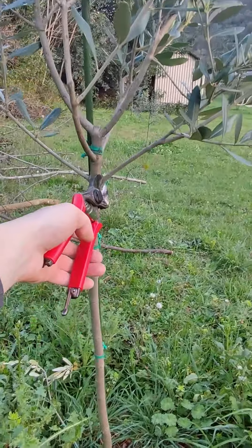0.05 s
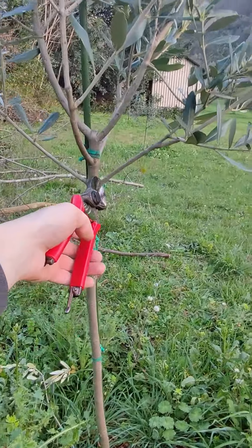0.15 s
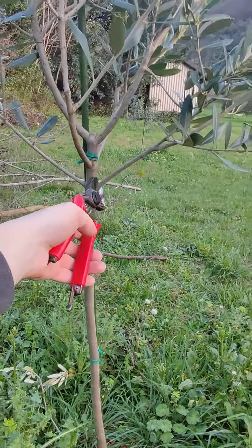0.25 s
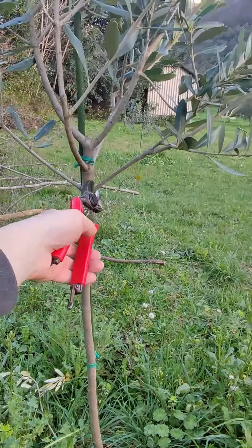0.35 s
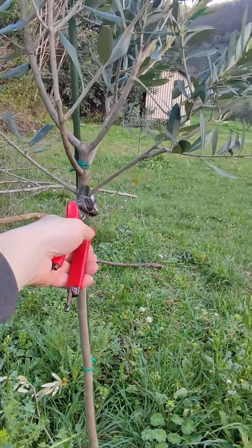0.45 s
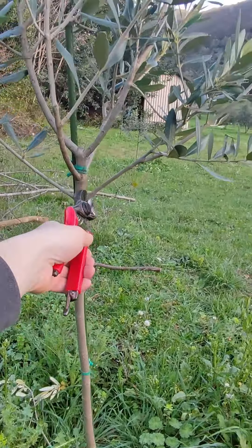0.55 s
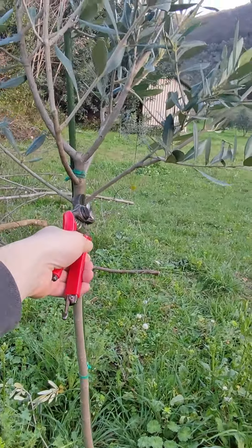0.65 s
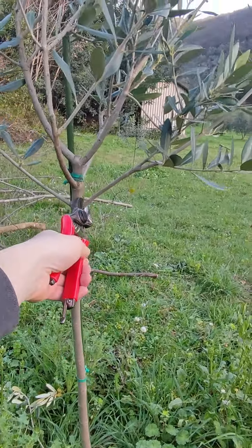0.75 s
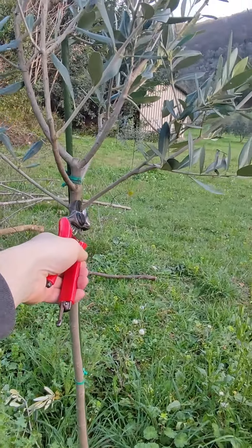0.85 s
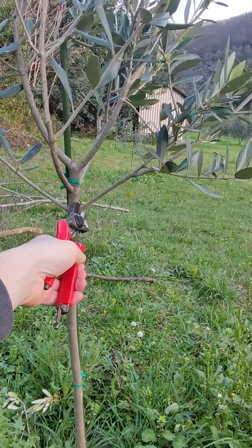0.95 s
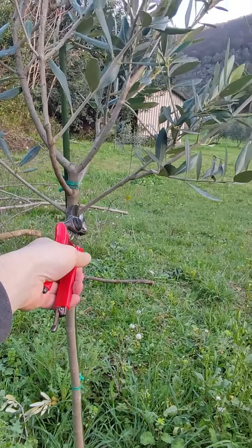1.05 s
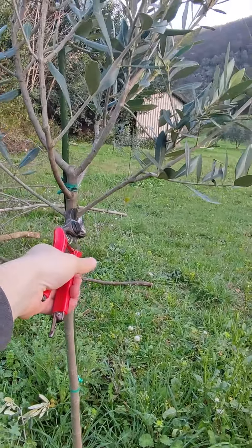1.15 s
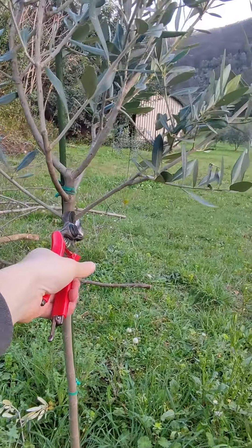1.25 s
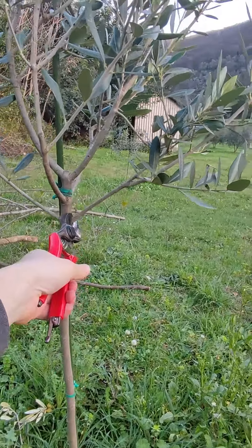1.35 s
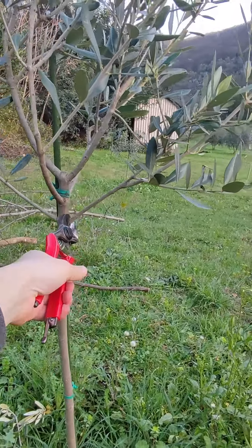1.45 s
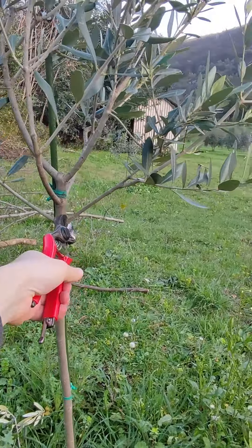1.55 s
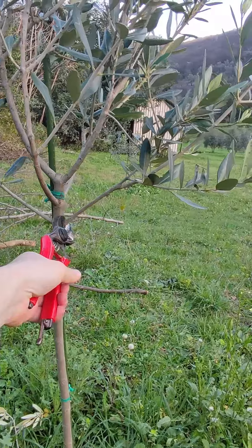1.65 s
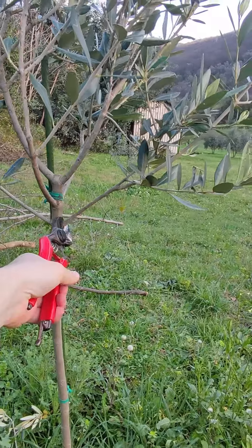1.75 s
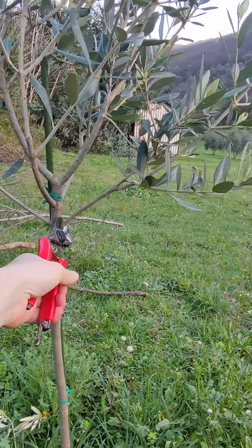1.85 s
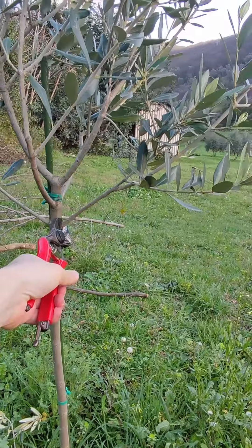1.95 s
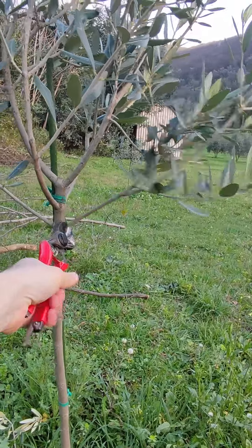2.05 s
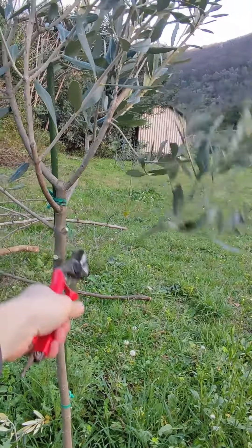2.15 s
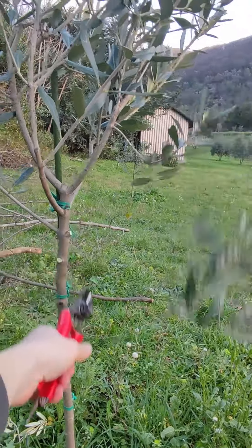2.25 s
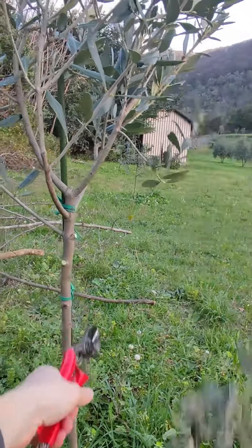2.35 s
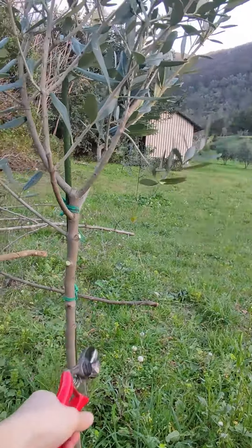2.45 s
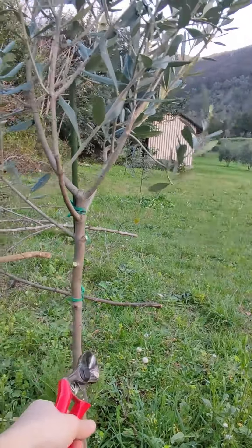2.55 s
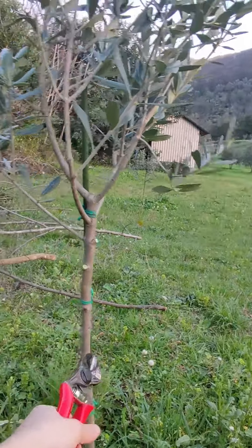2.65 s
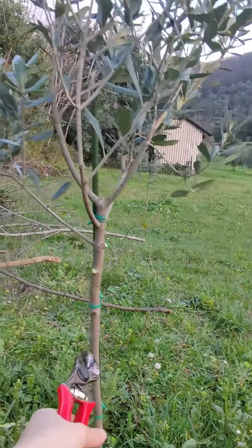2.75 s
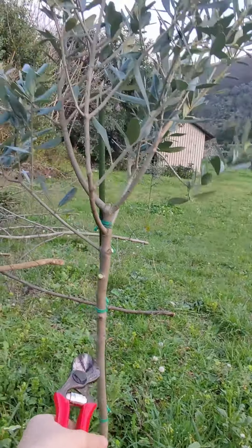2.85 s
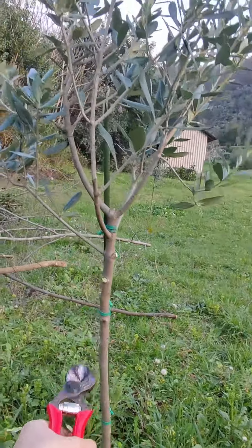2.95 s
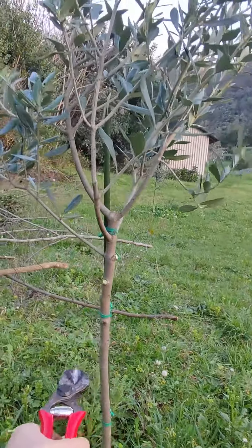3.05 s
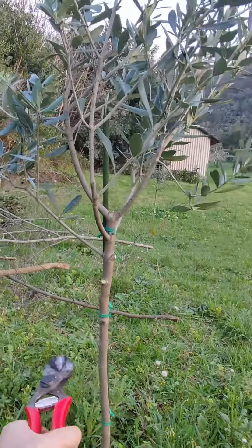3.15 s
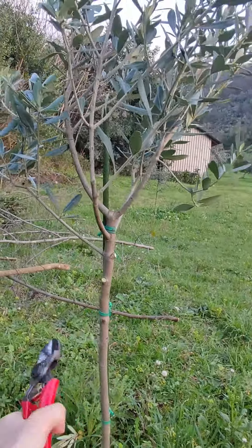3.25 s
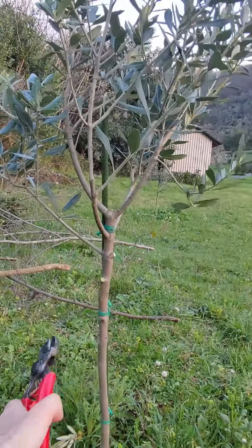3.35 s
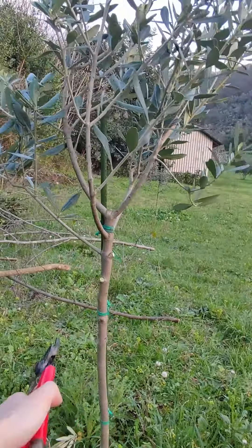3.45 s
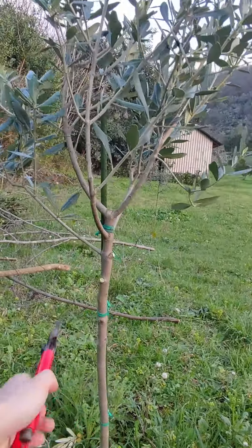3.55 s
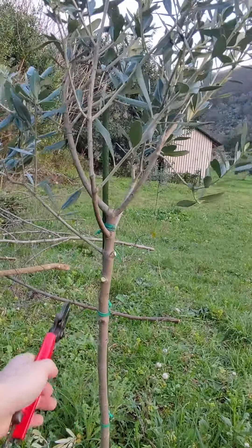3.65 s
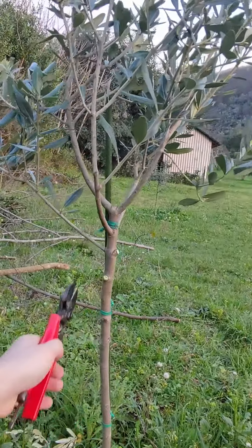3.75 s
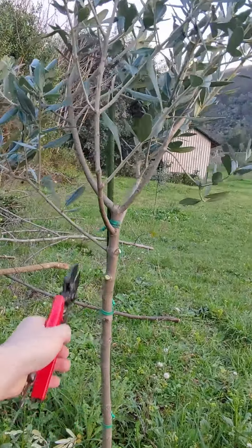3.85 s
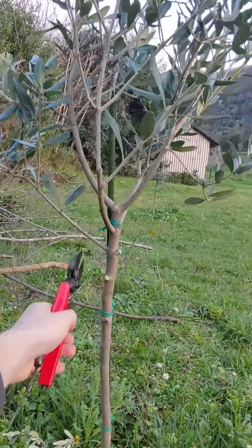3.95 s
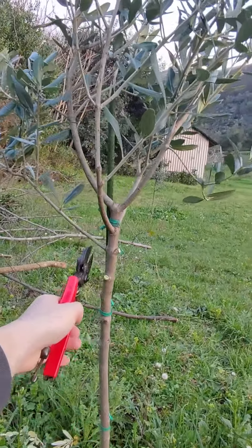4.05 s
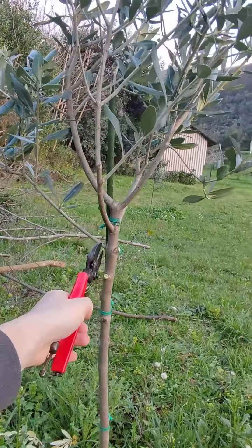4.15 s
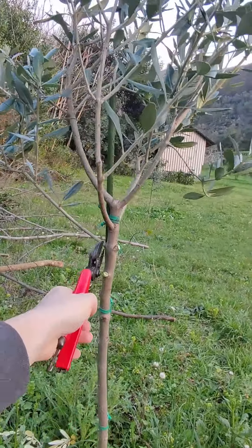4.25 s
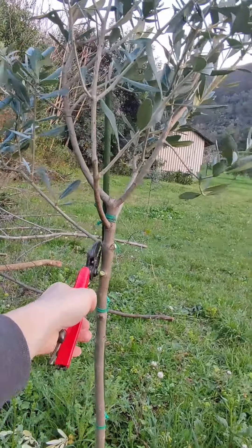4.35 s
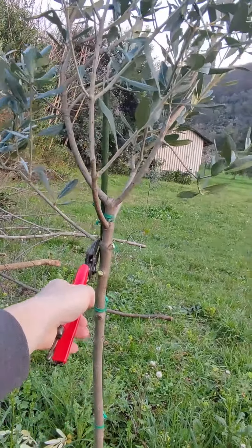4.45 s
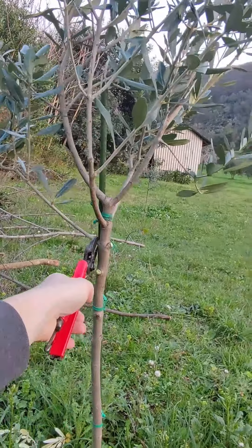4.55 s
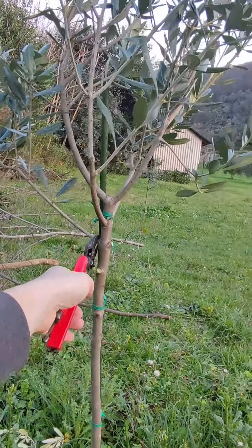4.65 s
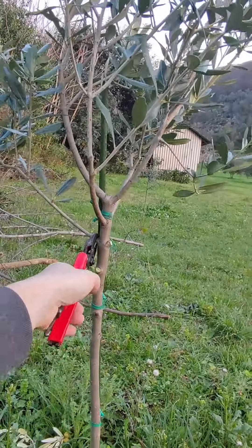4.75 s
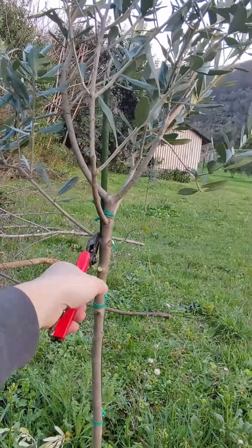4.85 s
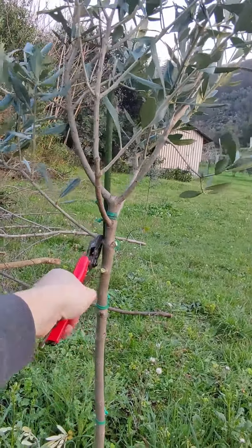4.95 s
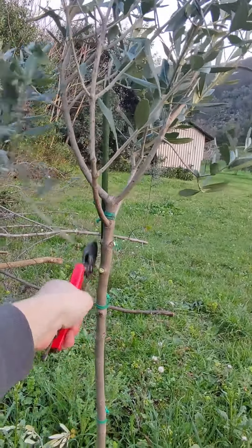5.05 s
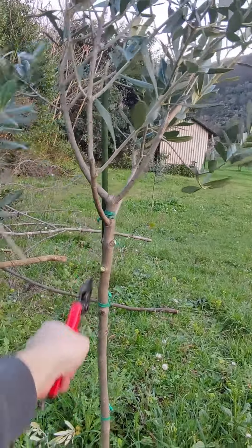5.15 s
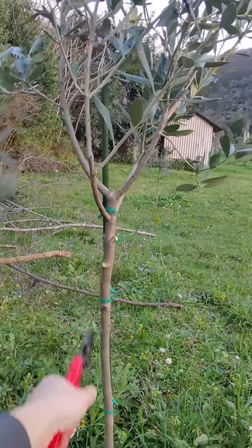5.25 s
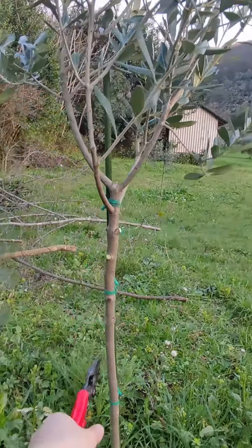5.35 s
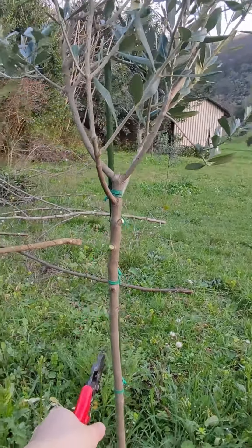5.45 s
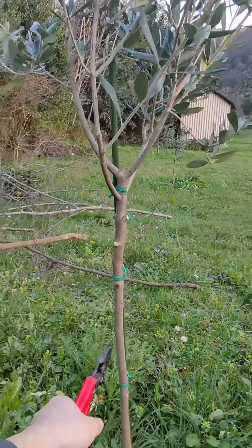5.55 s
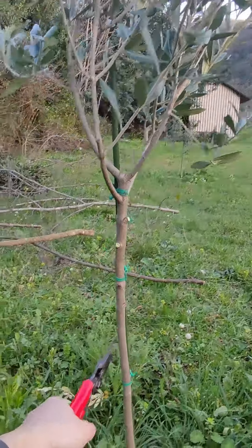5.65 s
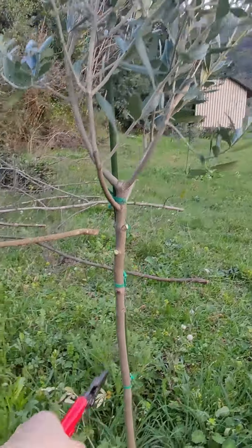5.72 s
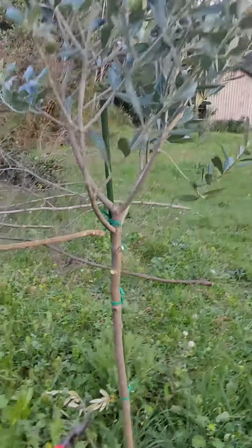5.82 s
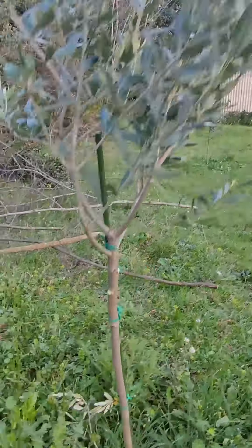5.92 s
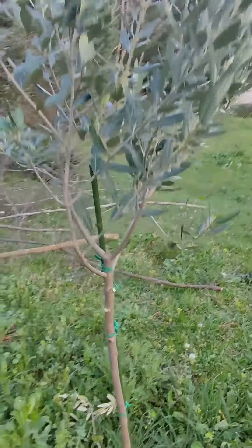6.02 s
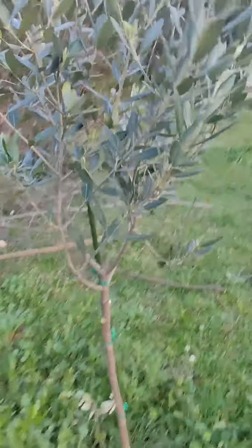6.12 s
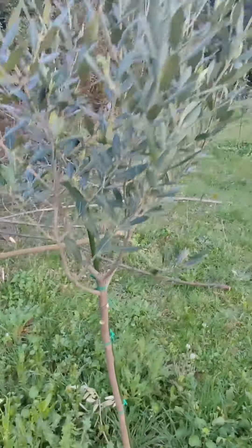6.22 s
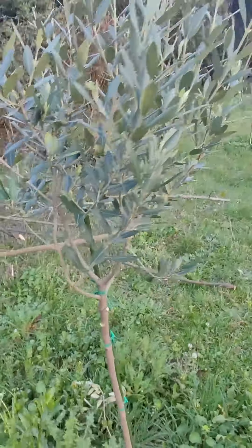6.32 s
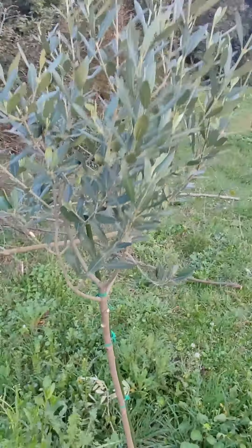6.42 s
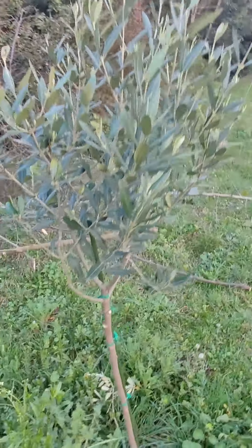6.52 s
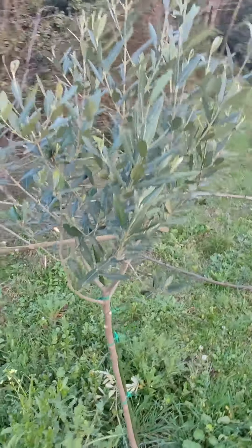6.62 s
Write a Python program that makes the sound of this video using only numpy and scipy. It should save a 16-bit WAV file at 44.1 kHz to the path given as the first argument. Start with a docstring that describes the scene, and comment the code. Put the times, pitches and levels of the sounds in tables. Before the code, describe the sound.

Soft valley air and low, uneven handling rumble lie under tiny far-off bird calls. A bright, woody snip breaks the calm, followed by a brief leafy brush. Birds and faint finger rubs continue until another crisp snip, slightly brighter. The shoot swishes down with dry ticks, and the take ends in muffled thumps from fingers on the device, leaning right.

```python
"""Pruning a young tree

Hand shears snip two shoots off a young tree in a quiet orchard, close to a hand-held camera.
Each cut excites ringing tones, scattered echoes and a crackle of noise; grains of noise make the leaves.
The leafy shoots slide down into the grass. Small birds, built from gliding tones, call far off.
Fingers rub (uneven noise) and knock (short pulses) on the camera beside its right microphone,
the tool ticks once, and low rumble and a soft wash of air lie underneath."""
import sys
import numpy as np
from scipy import signal
from scipy.fft import rfft, irfft
from scipy.io import wavfile

SR = 44100
rng = np.random.default_rng(int(sys.argv[2]) if len(sys.argv) > 2 else 0)


def to_wav(sig):
    """Store sig (one row per channel, or 1-D mono) as 16-bit WAV at the path in sys.argv[1].

    Samples outside -1..1 are clipped; the rate is SR.
    """
    pcm = np.clip(np.atleast_2d(sig), -1, 1) * 32767
    pcm = np.round(pcm).astype(np.int16)
    wavfile.write(sys.argv[1], SR, pcm.T)  # frames by channels


N = 294588
T = np.arange(N) / SR  # time of every sample [s]
HZ = np.fft.rfftfreq(N, 1 / SR)  # frequency of every spectrum bin

# wood giving way under the blade: (time [s], strength [dB], which cut [0 or 1])
FRACTURES = [(2.1051, -28, 0), (2.1062, -12, 0), (2.10667, -1, 0), (2.1108, -23, 0), (5.0781, 0, 1),
             (5.0826, -22, 1), (5.0844, -24, 1)]
# fingers knocking on the camera, and one bright tick of the tool at 3.324 s:
# (time [s], thud level [dB], thud pitch [Hz], tap level [dB], tap brightness [Hz])
KNOCKS = [ (0.497, -46, 195, -48, 700), (1.534, -51, 160, -45, 549), (3.324, -63.5, 199.7, -44.5, 2580),
          (3.3947, -60, 300, -42, 740), (3.752, -38, 228, -44, 444), (5.126, -37, 141.7, -39.5, 484),
          (5.707, -37, 110.4, -32.5, 496), (6.032, -19.5, 148, -30.5, 550),
          (6.127, -17.5, 48.7, -11.5, 834), (6.1335, -36, 111, -21.5, 750), (6.246, -33, 45, -38, 553),
          (6.257, -26.5, 65, -33.5, 593), (6.389, -16, 74, -30.5, 699)]
# tone colour of leaves, twigs and fibres: (frequency [Hz], relative level [dB])
LEAF_COLOUR = [(300, -12), (1000, -0.5), (2200, -0.5), (3000, -2), (4200, -5.5), (6500, -4.5), (8500, -3.5),
               (10000, -15), (12500, -8.5), (14500, -10)]
# where leaves and fibres are heard: (frequency [Hz], left minus right [dB])
LEAF_SIDE = [(1000, -3.5), (4000, 6), (6000, 8), (8200, 13.5), (10500, 1.5), (14000, 0)]


def amp(db):
    """Turns decibels into a gain."""
    return 10 ** (np.asarray(db) / 20)


def evened(x):
    """Scales a signal to an rms level of 1."""
    return x / np.sqrt(np.mean(x ** 2) + 1e-20)


def read(points, hz):
    """Reads a spectrum table between its points, on a log-frequency axis."""
    f, value = np.transpose(points)
    return np.interp(np.log(hz + 1), np.log(f + 1), value)


def curve(rows):
    """Reads a (time, value) table at every sample."""
    times, values = np.transpose(rows)
    return np.interp(T, times, values)


def pan(side_db):
    """Gives left and right gains whose squares add up to 2."""
    gains = np.array([amp(side_db / 2), amp(-side_db / 2)]).reshape(2, -1)
    return gains / np.sqrt(np.mean(gains ** 2, 0))


def filtered(x, gain):
    """Multiplies the spectrum of a full-length signal by a gain at each frequency."""
    return irfft(rfft(x) * gain, N)


def colour(x, points, side_db=0):
    """Gives a signal a spectrum and a place between the microphones, at rms 1."""
    return evened(filtered(x, amp(read(points, HZ)) * pan(side_db)))


def noise():
    """Makes plain random hiss, separate for left and right."""
    return rng.standard_normal((2, N))


def drift(rate_hz, size=N):
    """Makes a slow random wander of rms 1 by keeping only the low frequencies of noise."""
    f = np.fft.rfftfreq(size, 1 / SR)
    slow = rfft(rng.standard_normal(size)) * (f > 0) / (1 + (f / rate_hz) ** 4)
    return evened(irfft(slow, size))


def add(mix, s, sound):
    """Mixes a sound in at time s, cutting off whatever runs past the end."""
    part = mix[:, max(round(s * SR), 0):][:, :sound.shape[1]]
    part += sound[:, :part.shape[1]]


def scatter(x, t60, onset):
    """A dense tail of reflections that builds up over onset seconds, different at each microphone."""
    t = T[:SR]
    tail = rng.standard_normal((2, SR)) * amp(-60 * t / t60) * (1 - np.exp(-(t / onset) ** 2))
    tail = tail / np.linalg.norm(tail, axis=1, keepdims=True)
    return signal.fftconvolve(x, tail, axes=1)[:, :N]


def air(level_db=-53, swell_db=0.5):
    """The soft wash of the open valley is coloured noise, swelling slightly."""
    # tone colour: (frequency [Hz], relative level [dB])
    wash_colour = [(20, 2.5), (55, -7.5), (120, -14), (230, -24), (550, -30.5), (980, -30), (1900, -40),
                   (3600, -43.5), (7000, -51), (9300, -56.5), (11900, -51), (14200, -49.5)]
    # place: (frequency [Hz], left minus right [dB])
    wash_side = [(30, -3.5), (120, -2.5), (400, -0.5), (1000, 1), (4000, 1.5), (8000, 2.5), (13000, -2)]
    # (frequency [Hz], left-right likeness, kept between 0 and 1 below)
    likeness = [(60, 0.78), (130, 0.19), (290, 0.28), (640, 0.48), (1410, -0.63), (3090, -1.4),
                (6800, -0.05), (15000, 0.023)]
    a, b = noise()
    same = np.clip(read(likeness, HZ), 0, 1)
    # the right side shares part of the left noise and fills up with its own
    right = irfft(same * rfft(a) + np.sqrt(1 - same ** 2) * rfft(b), N)
    wash = colour(np.array([a, right]), wash_colour, read(wash_side, HZ))
    return wash * amp(level_db + swell_db * drift(3))


def rumble(gust_db=3, jolt_db=-23, jolt_s=0.021):
    """The moving hand and air rumble, mostly at the right; each thud adds a brief swell of rumble."""
    # level of the low rumble: (time [s], level [dB])
    rumble_levels = [(0, -61), (.3, -44.5), (.85, -67.5), (1.05, -43.5), (1.3, -64.5), (2.1, -51),
                     (3.4, -51.5), (4.8, -56.5), (5.12, -46.5), (5.45, -51), (5.78, -43), (6.25, -37),
                     (6.55, -51)]
    # tone colour: (frequency [Hz], relative level [dB])
    rumble_colour = [(10, -1), (35, 0.5), (75, -7.5), (130, -19.5), (250, -28), (600, -70)]
    shaking = amp(curve(rumble_levels))[None]
    t = T[:SR]
    swing = t / jolt_s * np.exp(1 - t / jolt_s)  # the grip is shaken most after jolt_s seconds
    for s, thud_db, *_ in KNOCKS:
        add(shaking, s, amp(thud_db + jolt_db) * swing[None])
    gusty = noise() * amp(gust_db * drift(5.1))
    return colour(gusty, rumble_colour, side_db=-15) * shaking


def rubbing(stick_db=7.0, rest_db=-74):
    """Finger skin sticks and slips on the case: noise whose level wanders at random."""
    # fingers sliding on the case: (time [s], length [s], level [dB])
    rubs = [(1.531, 0.041, -55), (1.886, 0.047, -58.5), (2.638, 0.26, -67.5), (3.42, 0.11, -58.5),
            (3.522, 0.063, -59.5), (3.739, .12, -60), (3.907, 0.083, -55.5), (4.202, 0.039, -64.5),
            (5.093, 0.088, -57.5), (5.303, .16, -63.5), (5.67, 0.1, -61), (6.019, .11, -61),
            (6.2, 0.12, -52.5), (6.58, 0.074, -66.5)]
    # tone colour: (frequency [Hz], relative level [dB])
    rub_colour = [(80, -11), (200, -2), (380, 3.5), (600, -5.5), (900, -20.5), (2000, -30.5), (5000, -46)]
    sliding = np.full((1, N), amp(rest_db))
    for s, length, db in rubs:
        add(sliding, s, amp(db) * signal.windows.tukey(int(length * SR), .7)[None])
    slips = amp(stick_db * np.minimum(drift(60), 1))  # caps the random wander so no burst of rubbing stands out
    return colour(noise() * slips, rub_colour, side_db=-14) * sliding


def stirring(rest_db=-87, sway_db=-17.5, sway_t60=4.2):
    """How hard the leaves move: each brush rises, holds and dies away into a slow sway."""
    # foliage brushed by the tool or a falling shoot:
    # (time when fully stirred [s], rise [s], hold [s], level [dB], time to fall 60 dB [s])
    brushes = [(2.084, 0.035, 0.16, -66, 0.32), (2.509, 0.0065, .06, -59.5, 0.45),
               (5.101, .015, 0.014, -62.5, 0.47), (5.22, 0.03, .02, -66, 0.72),
               (5.383, 0.051, .05, -67.5, 0.42), (5.536, .03, 0.058, -70, 1),
               (5.768, .025, 0.024, -69.5, 1), (6.19, 0.13, .03, -71.5, 0.73),
               (6.639, .05, .04, -69.5, 0.31)]
    power = amp(rest_db) ** 2
    for s, rise, hold, db, t60 in brushes:
        attack = np.exp(-(np.minimum(T - s, 0) / rise) ** 2)
        after = np.maximum(T - s - hold, 0)
        dying = amp(-60 * after / t60) ** 2
        swaying = amp(sway_db - 60 * after / sway_t60) ** 2
        power = power + (amp(db) * attack) ** 2 * (dying + swaying)
    return np.sqrt(power)


def leaves(grain_db=2.0, grains_per_s=2500):
    """Many small leaf contacts come in clumps and merge into a grainy hiss."""
    clumps_db = 1.5 * drift(35)
    size = amp(grain_db * np.minimum(rng.exponential(1, (2, N)), 5) + clumps_db)
    contacts = size * noise() * (rng.random((2, N)) < grains_per_s / SR)
    hiss = evened(contacts) + .9 * noise()
    return colour(hiss, LEAF_COLOUR, read(LEAF_SIDE, HZ)) * stirring()


def sing(hz, wobble_hz):
    """A thin tone trembles about a pitch curve; deep wobbles are also fast, and buzz."""
    # place of the birds: (frequency [Hz], left minus right [dB])
    bird_side = [(3600, 6.5), (5200, 6), (8000, 15)]
    wobble = wobble_hz * drift(2 * wobble_hz + 20, size=16384)[:len(hz)]
    tone = np.sin(2 * np.pi * np.cumsum(hz + wobble) / SR)
    return pan(read(bird_side, hz.mean())) * tone


def note(length, hz, drop_hz, db, wobble_hz):
    """A whistle glides quickly onto its pitch, from above if drop_hz is positive."""
    t = T[:int(length * SR)]
    pitch = hz + drop_hz * np.exp(-4.8 * t / length)  # 4.8 time constants within one note
    return amp(db) * signal.windows.tukey(len(t), .3) * sing(pitch, wobble_hz)


def chirps(out, length=.03, rise_hz=190, wobble_hz=90):
    """Faint short tones glide upwards; others, farther off, come at random."""
    # (time [s], end pitch [Hz], level [dB])
    chirp_calls = [(.485, 2476, -72), (0.556, 2970, -74), (.64, 4420, -77.5), (1.28, 2892, -79.5),
                   (2.92, 4130, -77), (3.22, 4150, -74), (4.41, 5000, -80)]
    twitter_count, low_hz, high_hz, twitter_db = 30, 2800, 5000, -82
    distant = rng.uniform((0, low_hz), (T[-1], high_hz), (twitter_count, 2))
    for s, hz, db in [*chirp_calls, *((s, hz, twitter_db) for s, hz in distant)]:
        add(out, s, note(length, hz, -rise_hz, db, wobble_hz))


def buzzes(out, sag_hz_per_s=17000, fade_db_per_s=86, wobble_hz=330, edge_s=.008):
    """High hoarse calls tremble fast in pitch while they sink and fade steadily."""
    # (time [s], length [s], start pitch [Hz], start level [dB])
    buzz_calls = [(.669, 0.069, 8000, -74.5), (.812, 0.06, 7860, -79), (3.889, 0.17, 8880, -65.5),
                  (5.04, 0.042, 9050, -64), (6.113, 0.043, 8700, -65.5), (6.653, .03, 8900, -66)]
    for s, length, hz, db in buzz_calls:
        t = T[:int(length * SR)]
        edges = np.minimum(np.minimum(t, length - t) / edge_s, 1)
        call = sing(hz - sag_hz_per_s * t, wobble_hz)
        add(out, s, edges * amp(db - fade_db_per_s * t) * call)


def song(out, wobble_hz=35):
    """A songbird repeats "pip pip teew", every note settling onto its pitch from above."""
    # (time [s], pip pitch [Hz], pip level [dB], wait for the slur [s], slur pitch [Hz], slur level [dB])
    phrases = [(.808, 5100, -74.5, 0.35, 3650, -68.5), (1.441, 4950, -69.5, .336, 3580, -69),
               (2.056, 4990, -68.5, .345, 3654, -70), (2.655, 4930, -68, 0.38, 3650, -70)]
    pip_s, pip_gap_s, pip_drop_hz = 0.054, 0.083, 230
    # the second pip is a little higher, softer and steeper
    second_up_hz, second_db, second_drop_hz = 90.78, -1.5, 400
    slur_s, slur_drop_hz, burr_hz, burr_depth = .115, 250, 178.3, .45
    for s, pip_hz, pip_db, wait, slur_hz, slur_db in phrases:
        add(out, s, note(pip_s, pip_hz, pip_drop_hz, pip_db, wobble_hz))
        second = note(pip_s, pip_hz + second_up_hz, second_drop_hz, pip_db + second_db, wobble_hz)
        add(out, s + pip_gap_s, second)
        slur = note(slur_s, slur_hz, slur_drop_hz, slur_db, wobble_hz)
        burr = 1 + burr_depth * np.sin(2 * np.pi * burr_hz * T[:slur.shape[1]])
        add(out, s + wait, slur * burr)  # a fast throb roughens the slur


def whistles(out, drop_hz=40, wobble_hz=14):
    """A second bird holds plain tones with only a slight glide."""
    # (time [s], length [s], pitch [Hz], level [dB])
    whistle_calls = [(1.314, .073, 4310, -74.5), (3.07, .17, 4370, -74.5), (4.53, .087, 4000, -80.5),
                     (5.241, .12, 4340, -74)]
    for s, length, hz, db in whistle_calls:
        add(out, s, note(length, hz, drop_hz, db, wobble_hz))


def birds(wet_db=0):
    """All the bird calls and their echo; the wooded slope echoes the low ones most."""
    out = np.zeros((2, N))
    chirps(out)
    buzzes(out)
    song(out)
    whistles(out)
    far = filtered(out, 1 / (1 + (HZ / 7000) ** 6))  # air absorbs the highest calls on the long path
    return out + amp(wet_db) * scatter(far, t60=0.96, onset=0.012)


def knocks(thud_cycles=0.45, tap_cycles=0.21, soft_hz=2600, side_db=-41):
    """Each knock or tick is a short tap pulse plus a low thud, as the camera body swings briefly."""
    out, t = np.zeros((2, N)), T[:12000]
    for s, thud_db, thud_hz, tap_db, tap_hz in KNOCKS:
        u = t * thud_hz / thud_cycles  # time in units of each pulse's own pace
        v = t * tap_hz / tap_cycles
        thud = u * np.exp(1 - u) * np.sin(2 * np.pi * thud_hz * t) * np.exp(-u / 2)
        tap = v ** 2 * (1 - v / 3) * np.exp(1 - v)
        add(out, s, pan(side_db) * (amp(thud_db) * thud - amp(tap_db) * tap))
    return signal.sosfilt(signal.butter(N=4, Wn=soft_hz, fs=SR, output="sos"), out)


def shears(rise=.00009, dull_hz=9700, bass_hz=1780, near_db=-22, far_db=-36):
    """Each fracture kicks the hand-damped modes; handle, trunk and orchard scatter the snap."""
    # ringing modes of shears and stem: (pitch [Hz], time to fall 60 dB [s], first cut left [dB],
    # first cut right [dB], second cut left [dB], second cut right [dB])
    shear_modes = [ (278, 0.077, 5.5, 7, -9, 8.5), (370, .022, 4, 12, -10.5, -4.5),
                   (916, 0.0076, 2, 0, -1.5, -10), (1880, .014, 14, 21, 2, 3),
                   (2080, .016, 21, 26, 26, 20.5), (2250, .016, 20, 26, 28, 28),
                   (3050, .012, 0.5, 4.5, 6, 10), (3740, 0.0055, 5.5, 15.5, 17.5, 3.5),
                   (4100, 0.0075, 16.5, 17.5, 13.5, 7.5), (5090, .007, 13, 5.5, 20.5, 1.5),
                   (5630, 0.017, 14, 4.5, 12, -5), (6780, 0.014, 1.5, -9.5, 12, -8.5),
                   (6900, 0.022, 23, -3.5, 9, -16), (7260, .006, 21, -7.5, 3.5, -22),
                   (8363, 0.016, -5.5, -21, 3.5, -22.5), (11600, .003, 8.5, 1, 4, -5.5),
                   (11760, .005, 1, 3.5, -1, -14.5), (14000, .004, 0.5, -3.5, 1, -16)]
    # tone colour of the scattered snap: (frequency [Hz], level [dB])
    scatter_colour = [(200, -3), (1200, -4), (2200, -12), (3200, -1), (6000, 3.5), (9000, -0.5),
                      (14000, -2.5)]
    # its place: (frequency [Hz], left minus right [dB])
    scatter_side = [(1000, 1.5), (4000, 0), (7000, 9.5), (9000, 9), (12000, 2)]
    modes, t, out = np.array(shear_modes), T[:4096], np.zeros((2, N))
    hz = modes[:, :1]
    decay = modes[:, 1:2] / np.log(1000)  # time constant [s]
    rings = np.exp(-t / decay) * np.sin(2 * np.pi * hz * t)
    rings = rings * 2 / (decay * SR) * (1 - np.exp(-t / rise))  # even out heights, soften the start
    thin = signal.sosfilt(signal.butter(4, bass_hz, "high", fs=SR, output="sos"), rings)
    rings = np.where(hz > bass_hz, thin, rings)  # the small steel parts radiate little bass
    heights = amp(modes[:, 2:]).T.reshape(2, 2, -1)  # cut, microphone, mode
    for s, db, cut in FRACTURES:
        add(out, s, amp(db) * heights[int(round(cut))] @ rings)
    # the microphone ports are dull in this band
    out = signal.lfilter(*signal.iirnotch(dull_hz, 5, fs=SR), out)
    snap = filtered(out, amp(read(scatter_colour, HZ)) * pan(read(scatter_side, HZ)))
    near = amp(near_db) * scatter(snap, t60=0.02, onset=0.0028)
    far = amp(far_db) * scatter(snap, t60=.25, onset=0.0054)
    return out + near + far


def fibres(level_db=-26, t60=0.032):
    """Fibres tear in a short crackle of fading noise behind each fracture."""
    out, t = np.zeros((2, N)), T[:3000]
    tearing = colour(noise(), LEAF_COLOUR, read(LEAF_SIDE, HZ))
    for k, (s, db, _) in enumerate(FRACTURES):
        piece = tearing[:, k * len(t):][:, :len(t)]  # a fresh stretch of noise each time
        add(out, s, amp(db + level_db - 60 * t / t60) * piece)
    return out


def twigs(t60=0.019):
    """Leaves and twigs flick drily, each a short spray of noise that dies at once."""
    # (time [s], level [dB], left minus right [dB])
    ticks = [(2.232, -54.5, 17), (4.905, -60.5, 12), (5.247, -56, 15), (5.531, -60, 10), (5.5462, -45.5, 5),
             (5.5592, -47, 26.5), (5.565, -57, 19), (6.189, -57, -12), (6.205, -53.5, -21),
             (6.354, -56, -19), (6.6445, -55.5, 1)]
    out, t = np.zeros((2, N)), T[:2000]
    spray = colour(noise(), LEAF_COLOUR)
    for k, (s, db, side_db) in enumerate(ticks):
        piece = spray[:, k * len(t):][:, :len(t)]
        add(out, s, amp(db) * pan(side_db) * piece * amp(-60 * t / t60))
    return out


def swishes(clump_db=1.5, side_db=3, spread_octaves=.22):
    """As the second shoot falls and the hand draws back, sliding leaves give a narrow, uneven hiss."""
    # (time [s], length [s], centre frequency [Hz], level [dB])
    slides = [(5.34, .13, 3580, -70.5), (5.483, 0.26, 5500, -80)]
    out = np.zeros((2, N))
    grain = noise() * amp(clump_db * drift(40))
    for s, length, hz, db in slides:
        octaves = np.log2((HZ + 1) / hz)  # distance from the centre
        hiss = evened(filtered(grain, np.exp(-.5 * (octaves / spread_octaves) ** 2)))
        swell = signal.windows.tukey(int(length * SR), .7)
        add(out, s, amp(db) * pan(side_db) * swell * hiss[:, :len(swell)])
    return out


def scene():
    """Adds up everything at the two microphones."""
    background = air() + rumble() + rubbing() + leaves() + birds()
    return background + knocks() + shears() + fibres() + twigs() + swishes()


def record(dry, ceiling=0.94, edge_hz=14400):
    """The recorder rounds off the tallest peaks, then removes everything above edge_hz."""
    rounded = dry / (1 + (dry / ceiling) ** 6) ** (1 / 6)
    band = signal.firwin(511, edge_hz, window=("kaiser", 9), fs=SR)
    return signal.oaconvolve(rounded, band[None], "same")


dry = scene()
out = record(dry)
to_wav(out)
```